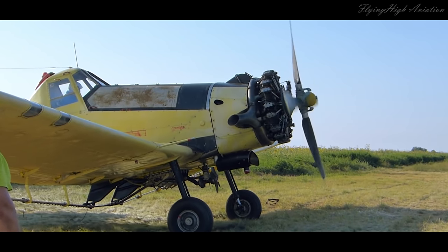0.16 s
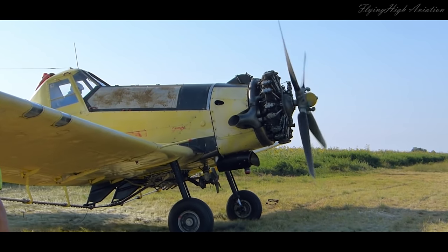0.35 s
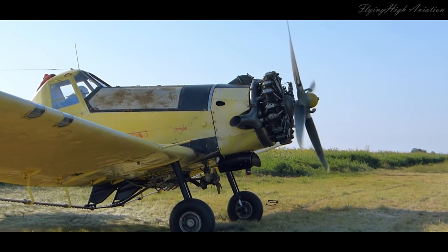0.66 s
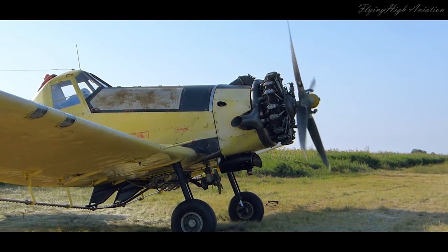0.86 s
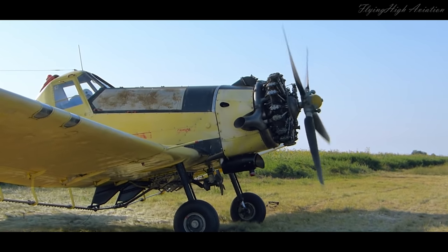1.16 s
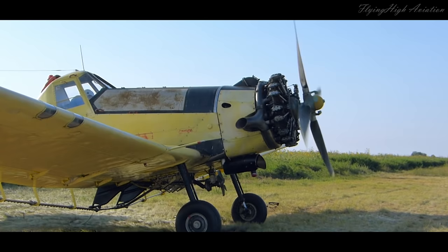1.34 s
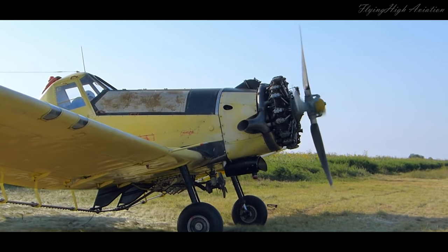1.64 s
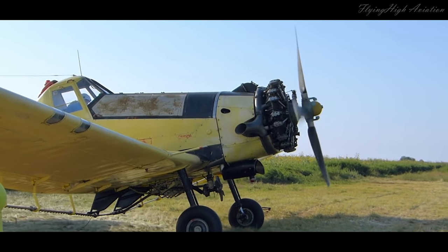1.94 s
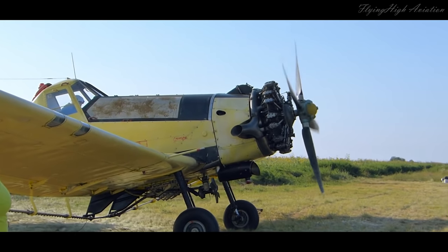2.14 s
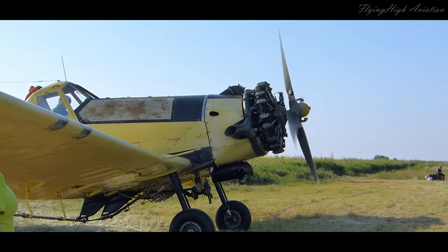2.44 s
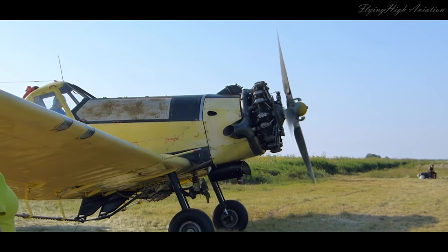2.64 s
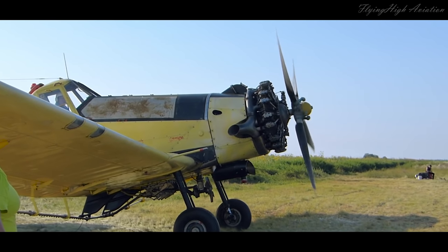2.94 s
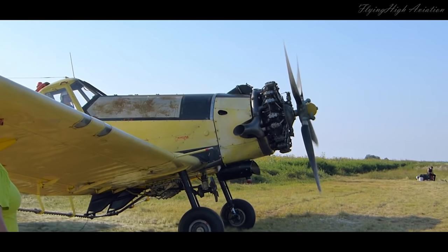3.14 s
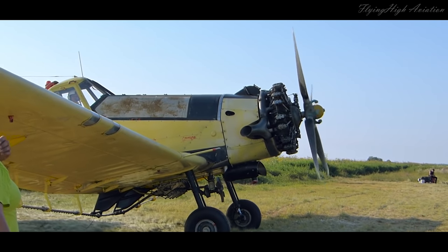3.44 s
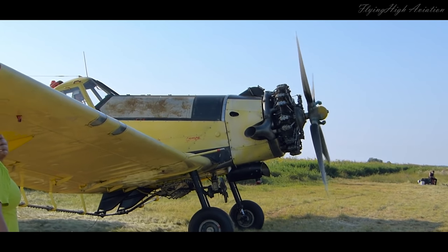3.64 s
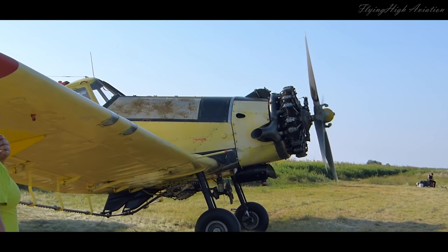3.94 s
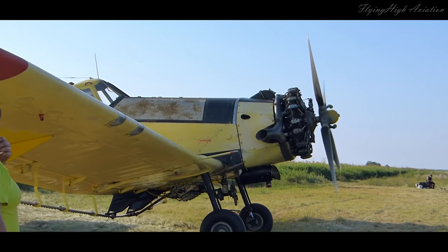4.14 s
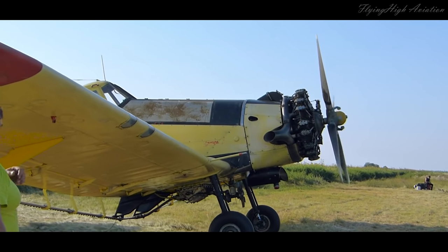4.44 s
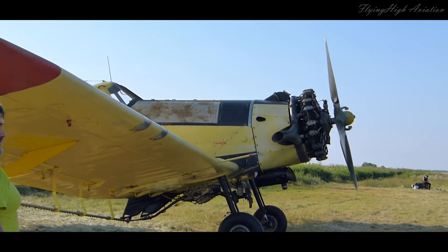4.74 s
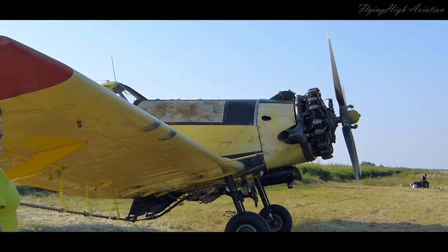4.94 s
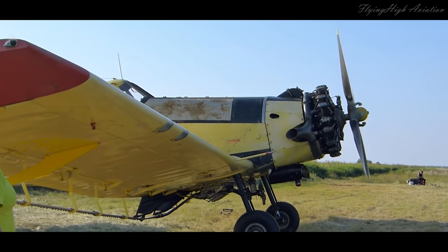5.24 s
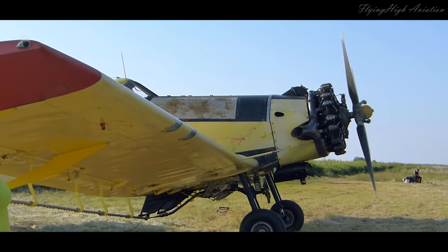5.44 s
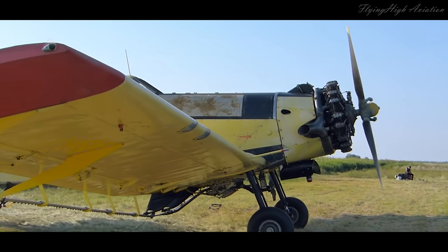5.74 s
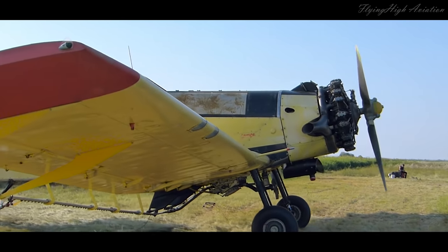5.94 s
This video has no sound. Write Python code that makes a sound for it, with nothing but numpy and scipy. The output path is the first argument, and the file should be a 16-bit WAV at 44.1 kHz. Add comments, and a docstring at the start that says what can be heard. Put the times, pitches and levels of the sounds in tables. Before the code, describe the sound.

Already running at the start, an old nine-cylinder aircraft engine thumps irregularly for half a second, then gathers speed and smooths into a fast, low, throbbing idle. Over the bassy drone, loose valves rattle and tick, rocker covers ping, and exhaust stacks bark and rasp now and then. Air rushes faintly beneath. Heard near the aircraft in open air, dry and continuous to the end.

```python
"""Idling radial engine

A nine-cylinder radial engine idles, picking up speed and then settling.
Its firings merge into a drone, a sinusoid at nine periods per two-turn cycle. Unequal cylinders excite
the resonances of collector and stacks in a loping pattern, and heavy burns thump, throb, bark and rasp.
Closing valves excite a clatter of noise bursts and ringing heads; exhaust and propeller air rush underneath."""
import sys
import numpy as np
from scipy import signal
from scipy.io import wavfile

SR = 44100
rng = np.random.default_rng(int(sys.argv[2]) if len(sys.argv) > 2 else 0)


def generate_wav(signal):
    """Clip the signal to [-1, 1] and save it as 16-bit WAV at the path in sys.argv[1]."""
    frames = np.transpose(np.atleast_2d(signal))
    scaled = np.clip(frames, -1, 1) * 32767
    pcm = np.round(scaled).astype(np.int16)
    wavfile.write(sys.argv[1], SR, pcm)


N = 268569

# Crank motion: speed closes on the idle exponentially; a cycle is two turns
IDLE_RPM, SHORTFALL_RPM, SETTLE_S = 1235.61, 265.5, 1.4844
START_CYCLE = -.0549   # position in the cycle at 0 s
CYCLES, CYLINDERS = 64, 9   # rows and columns of all draws per firing; the first row is cycle -1
# Crank running a little ahead of or behind the smooth speed law: start_s, crank_degrees
HUNTING = [(0.0, 3.02), (0.36, -1.68), (0.72, -2.81), (1.07, -0.74), (1.43, 0.79), (1.79, 3.04),
           (2.15, 3.4), (2.51, 2.04), (2.87, 1.46), (3.22, 1.21), (3.58, 0.03), (3.94, -1.12), (4.3, 0.06),
           (4.66, 2.54), (5.02, 4.47), (5.37, 4.29), (5.73, 4.43), (6.09, 3.28)]

# Air rush of exhaust and propeller, relative spectrum: pitch_hz, density_db (per Hz)
RUSH_SPECTRUM = [(45, -28.5), (70, 1), (150, -18), (210, 4), (300, -8), (370, 4.5), (420, -8.5), (520, 7),
                 (640, -1), (820, -3.5), (1200, -4.5), (2100, -16), (3600, -9.5), (5500, -42),
                 (8000, -68.5), (13000, -72.5)]
# Left-right likeness of the rush, tap, gear and flutter noise: pitch_hz, likeness (0 to 1)
LIKENESS = [(100, 0.85), (1000, 1), (2500, 0.99), (5000, 0.95), (8000, 0.74), (12000, 0.67)]
RUSH_DB, DRONE_DB = -39, -23
DRONE_GROWTH_DB = 1   # per 100 rpm

# Valve gear, one row per cylinder, relative: crank_angle (firings), tap_db, cover_ping_db
VALVES = [(2.4, -7, -14), (3.4, -3, -12), (4.45, 0, -7), (5.4, -4, -14), (6.45, -8, -14), (7.35, -16, -16),
          (8.4, 0, -4), (9.5, -2.5, 0), (10.55, -7, -14)]
# Valves that seat hardest, before HARD_SEAT_DB is added: start_s, level_db
HARD_SEATS = [(0.0937, -37.5), (0.2848, -45), (0.3336, -48), (0.3508, -38), (0.4522, -37), (0.4932, -42.5),
              (0.5653, -41), (0.63, -46.5), (0.6779, -50.5), (0.6942, -43.5), (0.7438, -48), (0.7876, -42),
              (0.9014, -36), (0.9502, -48), (0.9637, -42), (1.0081, -38.5), (1.1787, -41.5), (1.2258, -38),
              (1.274, -39.5), (1.345, -38.5), (1.6035, -45.5), (1.706, -47.5), (1.9608, -43), (2.061, -36),
              (2.1208, -44.5), (2.166, -45), (2.2657, -56.5), (2.4254, -44), (2.568, -45.5),
              (2.7168, -40.5), (2.773, -45), (2.819, -39), (2.8728, -45.5), (2.9178, -41.5), (3.268, -46.5),
              (3.3708, -51.5), (3.47, -44), (3.5049, -42.5), (3.5683, -45), (3.6688, -40), (3.7375, -38),
              (3.765, -44), (3.8114, -43.5), (4.0642, -47), (4.1608, -49), (4.358, -48), (4.368, -48.5),
              (4.4542, -37), (4.555, -45.5), (4.8825, -45), (4.9028, -42), (4.9562, -43), (5.1412, -46.5),
              (5.2086, -40), (5.3366, -39.5), (5.3787, -44), (5.627, -44), (5.7269, -47.5), (5.965, -44),
              (6.0177, -42.5)]
# Resonances of cylinder heads and covers, relative: pitch_hz, width_hz, level_db
HEADS = [(1060, 55, -21.5), (1138, 180, -4.5), (1280, 290, -9), (1692, 78, -4), (2160, 120, -12.5),
         (2484, 170, -4), (2943, 66, -2), (3376, 160, -4), (3675, 250, -5.5), (3983, 84, -1),
         (4340, 260, -7), (5255, 180, -7.5)]
# Relative spectrum of taps and steady gear noise: pitch_hz, density_db (per Hz)
TAP_SPECTRUM = [(700, -15.5), (1200, -1), (2100, 4.5), (3100, -1.5), (4000, 7.5), (5200, 2), (6300, -7),
                (8000, -30), (10000, -39), (13000, -46), (15500, -44)]
# Relative spectrum of the thin hiss from every closing valve: pitch_hz, density_db (per Hz)
FLUTTER_SPECTRUM = [(3000, -21), (4200, -9), (5200, 0), (6500, -2.5), (8000, -16.5), (10000, -35),
                    (14000, -41.5)]
# Level of the whole valve gear, before its slow waver: start_s, level_db
CLATTER_LEVELS = [(0, -42.5), (1.5, -46), (2.8, -42.5), (4.2, -43.5), (6.09, -42.5)]
VALVE_LEAD_MS = -23.5   # mean delay from the crank angle; negative is early
HARD_SEAT_DB, CRACK_DB = 43.5, 6.5   # gain from table to tap size; extra crackle of the hardest seats
TAP_UNEVEN_DB, PING_UNEVEN_DB, GEAR_WAVER_DB = 0.5, 3.5, 0.91
TAKE_UP_MS, TAKE_UP_DB = 2.7, -3.5   # the rocker takes up its play just before the valve seats
FLUTTER_DB, FLUTTER_MS, FLUTTER_UNEVEN_DB, FLUTTER_WAVER_DB = -11, 1.7, 2.5, 3.5
PING_HZ, PING_WIDTH_HZ = 3136, 61
GEAR_CUT_HZ, HEAD_CUT_HZ = 5640, 6000   # the steady gear noise is duller than the taps

# Hardest pings of covers and heads, before CLINK_OVER_DB: start_s, level_db, pitch_hz
CLINKS = [(0.2827, -29, 3140), (0.3376, -42, 4000), (0.45, -37, 3200), (0.7417, -41, 3410),
          (0.9033, -26.5, 3460), (1.2286, -30, 3780), (1.3289, -31, 3120), (1.451, -30, 3120),
          (1.4955, -30, 4050), (1.6037, -29.5, 3650), (1.709, -34, 3880), (1.8564, -29, 4020),
          (2.0048, -28, 3850), (2.062, -33, 3890), (2.178, -28, 3200), (2.5676, -33, 3060),
          (2.5835, -26, 3150), (2.628, -29, 3200), (2.718, -34, 3110), (2.9682, -31, 3360),
          (3.1298, -36, 3500), (3.1852, -37, 3440), (3.274, -32, 3460), (3.3727, -30, 3360),
          (3.471, -36, 3900), (3.4846, -27, 3060), (3.6707, -35, 4250), (3.9774, -44, 4020),
          (4.0632, -33, 3430), (4.1609, -37, 3720), (4.3151, -33, 3140), (4.373, -25.5, 3070),
          (4.556, -28, 3110), (4.6544, -27, 3120), (4.666, -25, 3090), (4.7635, -33, 3280),
          (4.946, -37, 2960), (5.0558, -30, 3150), (5.1547, -35, 3010), (5.2395, -27, 3660),
          (5.3393, -31, 3070), (5.3802, -30, 3260), (5.4473, -27, 3070), (5.546, -32, 3160),
          (5.642, -25, 3080), (5.7279, -38, 3060), (5.7816, -25, 4330), (5.8346, -36, 3720),
          (6.024, -32, 3080), (6.0326, -29, 3000)]
CLINK_OVER_DB, CLINK_MS = -6, 1.3   # share that rings clean; time to swell
CLINK_SPREAD_DB = -23   # how hard a clink also rings the neighbouring heads
# Heavy burns before the idle evens out: start_s, level_db
CHUGS = [(.047, -32.5), (.108, -31.5), (0.169, -37), (.222, -30), (.288, -33), (.335, -37), (0.405, -38),
         (.452, -42)]
CHUG_HZ, CHUG_WIDTH_HZ = 124, 36
CHUG_TOP_HZ, CHUG_TOP_DB = 172, -7   # the thump also rings higher up
# Two cylinders that puff hard into one stack, before a fixed cut: crank_angle (firings), height_db
THROBBERS = [(1.646, -31.5), (5.779, -30)]
THROB_HZ, THROB_WIDTH_HZ = 509.5, 62
THROB_HEIGHT_CYCLE, THROB_RISE_DB, THROB_FALL_DB = 6.8, 0.4, 0.5   # rise and fall per cycle
THROB_UNEVEN_DB = 1.3
# Short barks from a stack, before BARK_OVER_DB: start_s, level_db, pitch_hz
BARKS = [(0.063, -31, 1050), (0.089, -24, 950), (0.333, -24, 1250), (0.47, -33, 1090), (0.563, -29, 1140),
         (0.674, -26, 1210), (1.005, -28, 860), (1.111, -30, 1160), (1.221, -35, 1110), (1.33, -28, 1290),
         (1.536, -35, 1030), (1.849, -32, 1270), (2.158, -29, 1350), (2.259, -31, 970), (2.337, -34, 980),
         (2.494, -29, 1120), (2.764, -27.5, 960), (3.008, -35, 1110), (3.171, -38, 1290),
         (3.661, -31, 1230), (4.158, -28.5, 1300), (4.729, -35, 1170), (5.078, -33, 1110),
         (5.665, -34, 1130), (6.01, -32, 1200)]
BARK_OVER_DB, BARK_MS = -9.5, 2.75
# Stacks that rasp on every cycle, relative: crank_angle (firings), level_db
RASPERS = [(.3, -47.5), (5.598, -45), (6.2, -48)]
RASP_HZ, RASP_WIDTH_HZ, RASP_MS, RASP_UNEVEN_DB = 1150, 460, 3.2, 5.5

# Each puff runs both ways round the collector ring to the outlet; one row per cylinder in firing order:
# short_way_ms, short_way_db, long_way_ms, long_way_db, short_growth_db, long_growth_db (per 100 rpm)
COLLECTOR = [(9.52, 6.09, 12.57, 6.95, 5.07, -0.02), (2.52, 3.01, 5.31, 1.88, -2.37, -2.9),
             (1.84, 0.26, 13.54, 4.42, 0.26, 8.44), (5.03, 2.28, 8.03, -0.86, 6.72, 0.14),
             (-0.11, -15.5, 13.58, 3.23, -9.63, -1.51), (7.16, 4.73, 15.72, 2.85, 4.05, -1.01),
             (0.87, 0.28, 14.28, 2.81, 0.38, -0.44), (6.25, 7.67, 8.98, 4.72, 3.12, 2.59),
             (0.04, 4.65, 10.4, 3.38, -0.59, 2.06)]
# The two ways of the brighter part, which leaves through the two stacks: columns as in COLLECTOR
STACKS = [(3.37, -10.3, 8.29, 0.16, -5.93, 9.37), (0.31, -0.7, 6.7, 0.41, 1.6, -0.22),
          (2.37, 4.47, 8.16, 6.3, 1.46, 4.01), (3.23, -1.56, 7.2, 4.98, -1.72, 2.03),
          (-0.02, 4.01, 6.74, 0.81, 2.12, -0.03), (5.1, 2.13, 17.32, -3.11, 3.04, 7.75),
          (3.13, -0.11, 11.55, -1.7, -1.12, -1.46), (2.22, -1.76, 8.46, 6.71, 5.91, 2.33),
          (0.48, -3.17, 10.06, -6.03, 11.54, -3.23)]
# Collector resonances, relative level at idle, arrival relative to the drone:
# pitch_hz, width_hz, level_db, arrival_ms, growth_db (per 100 rpm)
RING_MODES = [(85.28, 55.56, 20.94, -24.74, 6.18), (94.9, 10.21, 27.6, -16.65, 4.16),
              (160.17, 9.28, 16.58, -35.52, 2.07), (219.33, 62.6, 11.18, -26.16, 5.98)]
# Stack resonances: columns as in RING_MODES
STACK_MODES = [(315.36, 75.25, -5.47, -21.31, 3.54), (364.5, 22.95, 3.96, -22.59, -0.5),
               (446.78, 33.49, 5.02, -24.63, 2.64), (525.88, 29.39, 4.4, -25.18, 7.53),
               (552.63, 49.56, 8.05, -21.99, 1.33), (626.52, 74.84, -1.51, -24.02, 0.17),
               (689.41, 46.68, -3.53, -12.32, 12.92)]
# Swell and fade of the lowest two and highest two stack resonances and the top collector resonance:
# start_s, low_stack_db, high_stack_db, top_collector_db
MODE_LEVELS = [(0, 3, 0, 1.5), (1, 3, -4.5, 3), (2, 0, 0, 2), (3, 1.8, 3, 0.5), (4, 1.5, 2, 0),
               (5, 0, 2, 1), (6.09, -12, -2, 0.5)]
RING_DB, STACK_DB = 1.8, 2.5
RING_CUT_HZ, PUFF_CUT_HZ = 250, 900   # the wide collector passes only the deep part; a puff is soft
BASS_CUT_HZ, DEEP_CUT_HZ = 60, 45

LEFT_DB, CUTOFF_HZ = .62, 15900   # left raised and right lowered by this; top edge of the sound


def from_db(db):
    """Decibel law: amplitude ratio of a level."""
    return 10 ** (np.asarray(db) / 20)


def rms_one(x):
    """Normalisation to unit root-mean-square."""
    return x / np.sqrt(np.mean(x ** 2) + 1e-20)


def in_time(rows):
    """Linear interpolation of each column over time."""
    start_s, *columns = np.transpose(rows)
    return [np.interp(np.arange(N) / SR, start_s, column) for column in columns]


def at_hz(points, hz):
    """Interpolation along a logarithmic frequency axis."""
    pitch_hz, values = np.transpose(points)
    return np.interp(np.log(hz), np.log(pitch_hz), values)


def chance(columns=CYLINDERS):
    """Independent normal deviates of spread 1, cycles by columns."""
    return rng.standard_normal((CYCLES, columns))


def drift(rate_hz):
    """Slow random fluctuation: noise twice through a one-pole low-pass, run in; rms 1."""
    r = np.exp(-2 * np.pi * rate_hz / SR)
    noise = rng.standard_normal(N + SR)
    return rms_one(signal.lfilter([1], [1, -2 * r, r * r], noise)[SR:])


def resonance(x, hz, width_hz):
    """Damped oscillator: a two-pole resonance with gain 1 on top."""
    r = np.exp(-np.pi * width_hz / SR)
    zeros = [(1 - r * r) / 2, 0, (r * r - 1) / 2]
    poles = [1, -2 * r * np.cos(2 * np.pi * hz / SR), r * r]
    return signal.lfilter(zeros, poles, x + 1e-18)


def soft_ring(clicks, hz, width_hz):
    """Cascaded resonance: applied twice it swells before it dies; a unit click peaks near 1."""
    twice = resonance(resonance(clicks, hz, width_hz), hz, width_hz)
    return twice * np.e * SR / (np.pi * width_hz)


def swell(clicks, ms):
    """Critically damped response: each click becomes a hump of height 1 / e, rising for ms."""
    r = np.exp(-1000 / (ms * SR))
    return signal.lfilter([1 - r], [1, -2 * r, r * r], clicks + 1e-18)


def band(x, low_hz, high_hz):
    """Band limitation between two edges."""
    return signal.sosfilt(signal.butter(2, [low_hz, high_hz], "band", fs=SR, output="sos"), x)


def dull(x, cut_hz):
    """Treble attenuation by a steep low-pass."""
    return signal.sosfilt(signal.butter(4, cut_hz, fs=SR, output="sos"), x)


def no_deep_bass(x):
    """Bass limitation: steep high-passes remove nearly everything far below the firing rate."""
    x = signal.sosfilt(signal.butter(6, BASS_CUT_HZ, "high", fs=SR, output="sos"), x)
    return signal.sosfiltfilt(signal.butter(6, DEEP_CUT_HZ, "high", fs=SR, output="sos"), x)


def coloured(envelope, spectrum):
    """Broadband noise with partial stereo coherence, built of third-octave bands; rms 1."""
    out, edges = 0, 50 * 2 ** (np.arange(26) / 3)
    white = rng.standard_normal((2, 2, N)) * envelope      # neighbouring bands get unrelated noise
    for k, (low, high) in enumerate(zip(edges, edges[1:])):
        mid, side = band(white[k % 2], low, high)
        hz = np.sqrt(low * high)
        alike = np.clip(at_hz(LIKENESS, hz), 0, 1)
        stereo = np.sqrt(1 + alike) * mid + np.sqrt(1 - alike) * side * [[1], [-1]]
        out = out + from_db(at_hz(spectrum, hz)) * stereo
    return rms_one(out)


def train(rows):
    """Impulse train: a click of the given size at every row's time."""
    clicks = np.zeros(N)
    clicks[[round(s * SR) for s, db in rows]] = from_db([db for s, db in rows])
    return clicks


def strikes(cycle, angles, delays_ms, sizes):
    """Crank-locked impulses: one click per column and cycle at its crank angle, heard after its delay."""
    wanted = np.arange(-1, len(sizes) - 1)[:, None] + np.asarray(angles) / CYLINDERS
    # carry the crank on for a second at either end
    before = cycle[0] - (IDLE_RPM - SHORTFALL_RPM) / 120
    after = cycle[-1] + IDLE_RPM / 120
    at = np.interp(wanted, np.r_[before, cycle, after], np.r_[-SR, np.arange(N), N + SR])
    at = at + np.asarray(delays_ms) * SR / 1000
    heard, clicks = (at >= 0) & (at < N - 1), np.zeros(N)
    clicks[at[heard].astype(int)] = sizes[heard]
    return clicks


def rings_at(rows, over_db, swell_ms, rough):
    """Transient tones, each swelling and dying at its own pitch; rough mixes in a detuned second tone."""
    out, t = np.zeros(N + SR), np.arange(SR // 20) / SR
    hump = t * 1000 / swell_ms * np.exp(1 - t * 1000 / swell_ms)
    for (s, db, hz), (detune, turn) in zip(rows, rng.uniform(-1, 1, (len(rows), 2))):
        second = np.sin(2 * np.pi * hz * (1 + 0.27 * detune) * t + np.pi * turn)
        tone = np.sin(2 * np.pi * hz * t) + rough * second
        start = round(s * SR)
        out[start:start + len(t)] += from_db(db + over_db) * hump * tone
    return out[:N]


def air_rush():
    """Turbulent flow noise of exhaust and propeller air, with a shaped steady spectrum."""
    return from_db(RUSH_DB) * no_deep_bass(coloured(1, RUSH_SPECTRUM))


def head_rings(cycle, tap_db, angle, lead_ms):
    """Modal excitation: in loose parts every mode gets its own strength and moment at each tap."""
    rings = 0
    for hz, width_hz, db in HEADS:
        size_db = db + .5 * tap_db + 5 * np.clip(chance(), -3, 2)
        clicks = strikes(cycle, angle, lead_ms + 1.477 + 2.5 * chance(), from_db(size_db))
        rings = rings + resonance(resonance(clicks, hz, width_hz), hz, 4 * width_hz)
    return rings


def cover_ping(cycle, cover_db, angle, lead_ms):
    """Lightly damped plate: rocker covers ping at one pitch, growing over the first cycles."""
    growth_db = np.minimum(np.linspace(-7, 9, CYCLES), 0)[:, None]
    size_db = cover_db + growth_db + PING_UNEVEN_DB * chance()
    clicks = strikes(cycle, angle, lead_ms + 1, from_db(size_db))
    return resonance(resonance(clicks, PING_HZ, PING_WIDTH_HZ), PING_HZ, 710)


def clatter(cycle, decay_ms, bed_db, ring_db, ping_db, sharp_db):
    """Impact excitation: seating valves rattle over gear noise and set heads and covers ringing."""
    angle, tap_db, cover_db = np.transpose(VALVES)
    lead_ms = VALVE_LEAD_MS + .7 * chance()
    force_db = TAP_UNEVEN_DB * np.clip(chance(), -2, 1.8)
    hard = train(HARD_SEATS)
    taps = strikes(cycle, angle, lead_ms, from_db(tap_db + force_db)) + from_db(HARD_SEAT_DB) * hard
    taps = taps + from_db(TAKE_UP_DB) * np.roll(taps, -round(TAKE_UP_MS * SR / 1000))

    rattle = coloured(rms_one(swell(swell(taps, decay_ms), decay_ms)), TAP_SPECTRUM)
    gear_noise = from_db(bed_db) * dull(coloured(1, TAP_SPECTRUM), GEAR_CUT_HZ)
    rings = head_rings(cycle, tap_db, angle, lead_ms)
    ping = cover_ping(cycle, cover_db, angle, lead_ms)
    body = dull(from_db(ring_db) * rms_one(rings) + from_db(ping_db) * rms_one(ping), HEAD_CUT_HZ)

    # squaring leaves the crackle mostly to hard seats
    crackle = swell((taps + from_db(HARD_SEAT_DB + CRACK_DB) * hard) ** 2, .45)
    sharp = rms_one(band(crackle * rng.standard_normal(N), 8000, 15800))
    closing_db = 0.22 * tap_db + FLUTTER_UNEVEN_DB * chance()
    closings = strikes(cycle, angle, lead_ms, from_db(closing_db))
    flutter = coloured(swell(closings, FLUTTER_MS) * from_db(FLUTTER_WAVER_DB * drift(4)), FLUTTER_SPECTRUM)

    gear = rms_one(rattle + gear_noise + from_db(FLUTTER_DB) * flutter + body + from_db(sharp_db) * sharp)
    return from_db(in_time(CLATTER_LEVELS)[0] + GEAR_WAVER_DB * drift(9.5)) * gear


def clinks():
    """Coupled resonators: the hardest pings ring at their own pitch and excite neighbouring heads."""
    out = rings_at(CLINKS, CLINK_OVER_DB, CLINK_MS, rough=.3)
    for hz, width_hz, db in HEADS[5:11]:      # the heads nearest in pitch
        rows = [(s + rng.uniform(0, .003), level_db + db + CLINK_SPREAD_DB + 4 * rng.standard_normal())
                for s, level_db, pitch_hz in CLINKS]
        out = out + soft_ring(train(rows), hz, 2 * width_hz)
    return out


def thumps():
    """Impulse response of the collector: heavy burns ring it at two deep pitches of opposite sign."""
    clicks = train(CHUGS)
    upper = from_db(CHUG_TOP_DB) * soft_ring(clicks, CHUG_TOP_HZ, CHUG_WIDTH_HZ)
    return upper - soft_ring(clicks, CHUG_HZ, CHUG_WIDTH_HZ)


def throb(cycle):
    """Repeated excitation of one stack resonance by two cylinders, growing to a height and fading."""
    angle, height_db = np.transpose(THROBBERS)
    past = np.arange(-1, CYCLES - 1)[:, None] - THROB_HEIGHT_CYCLE
    course_db = np.minimum(THROB_RISE_DB * past, -THROB_FALL_DB * past)
    size_db = height_db + course_db + THROB_UNEVEN_DB * chance(2)
    return soft_ring(strikes(cycle, angle, 0, from_db(size_db - 4.0)), THROB_HZ, THROB_WIDTH_HZ)


def rasps(cycle):
    """Amplitude-modulated noise: some stacks puff resonant hiss once per cycle."""
    hiss = rms_one(dull(resonance(rng.standard_normal(N), RASP_HZ, RASP_WIDTH_HZ), 2000))
    angle, level_db = np.transpose(RASPERS)
    size_db = level_db + RASP_UNEVEN_DB * chance(len(angle))
    return swell(strikes(cycle, angle, 0, from_db(size_db)), RASP_MS) * hiss * from_db(6.0)


def barks():
    """Interference of paired, detuned transient tones gives each stack bark its roughness."""
    return rings_at(BARKS, BARK_OVER_DB, BARK_MS, rough=1.0)


def duct(cycle, below_idle_rpm, modes, ways, burn_db, late_ms):
    """Two-path propagation: puffs by both ways ring every duct resonance, some changing with speed."""
    short_ms, short_db, long_ms, long_db, short_growth, long_growth = np.transpose(ways)
    both_ways = ((short_ms, short_db, short_growth), (long_ms, long_db, long_growth))
    # hundreds of rpm below idle, cycle by cycle
    slow = np.interp(np.arange(CYCLES) - .5, cycle, below_idle_rpm)[:, None] / 100
    out = 0
    for hz, width_hz, db, arrival_ms, growth_db in modes:
        clicks = 0
        for way_ms, way_db, own_growth_db in both_ways:
            size_db = db + way_db + burn_db - (growth_db + own_growth_db) * slow
            delay_ms = arrival_ms + way_ms + late_ms
            clicks = clicks + strikes(cycle, np.arange(CYLINDERS), delay_ms, from_db(size_db))
        out = out + resonance(clicks, hz, width_hz)
    return out


def exhaust(cycle, below_idle_rpm, uneven_db, wobble_ms):
    """Pipe resonance: uneven puffs excite the deep collector and the brighter stacks."""
    burn_db, late_ms = uneven_db * chance(), wobble_ms * chance()
    low_db, high_db, top_db = in_time(MODE_LEVELS)

    def part(level_db, modes, ways):
        """Superposition of modes under one common level."""
        return from_db(level_db) * duct(cycle, below_idle_rpm, modes, ways, burn_db, late_ms)

    deep = part(0, RING_MODES[:3], COLLECTOR) + part(top_db, RING_MODES[3:], COLLECTOR)
    bright = part(low_db, STACK_MODES[:2], STACKS) + part(0, STACK_MODES[2:5], STACKS)
    bright = bright + part(high_db, STACK_MODES[5:], STACKS)
    deep, bright = from_db(RING_DB) * deep, from_db(STACK_DB) * bright
    return no_deep_bass(dull(deep, RING_CUT_HZ) + dull(bright, PUFF_CUT_HZ))


def firing_drone(cycle, below_idle_rpm):
    """Fundamental of a periodic source: nine firings a cycle merge into one tone, louder with speed."""
    level_db = DRONE_DB - DRONE_GROWTH_DB * below_idle_rpm / 100
    return np.sqrt(2) * from_db(level_db) * np.cos(2 * np.pi * CYLINDERS * cycle)


def crank():
    """Integration of speed gives the crank position in cycles; also returns the rpm still below idle."""
    below_idle_rpm = SHORTFALL_RPM * np.exp(-np.arange(N) / SR / SETTLE_S)
    smooth = START_CYCLE + np.cumsum(IDLE_RPM - below_idle_rpm) / 120 / SR
    return smooth + in_time(HUNTING)[0] / 720, below_idle_rpm


def scene():
    """Superposition of all sources, a little to the left by level difference."""
    cycle, below_idle_rpm = crank()
    gear = clatter(cycle, decay_ms=1.1, bed_db=2.0, ring_db=5.5, ping_db=-3.0, sharp_db=-44.5)
    stray_burns = thumps() + throb(cycle) + barks() + rasps(cycle)
    pipes = exhaust(cycle, below_idle_rpm, uneven_db=0.44, wobble_ms=0.079)
    drone = firing_drone(cycle, below_idle_rpm)
    mix = air_rush() + gear + clinks() + stray_burns + pipes + drone
    return mix * from_db([[LEFT_DB], [-LEFT_DB]])


def record(dry):
    """Band limitation: a steep low-pass cuts the top."""
    return signal.sosfilt(signal.cheby2(12, 70, CUTOFF_HZ, fs=SR, output="sos"), dry)


dry = scene()
out = record(dry)
generate_wav(out)
```